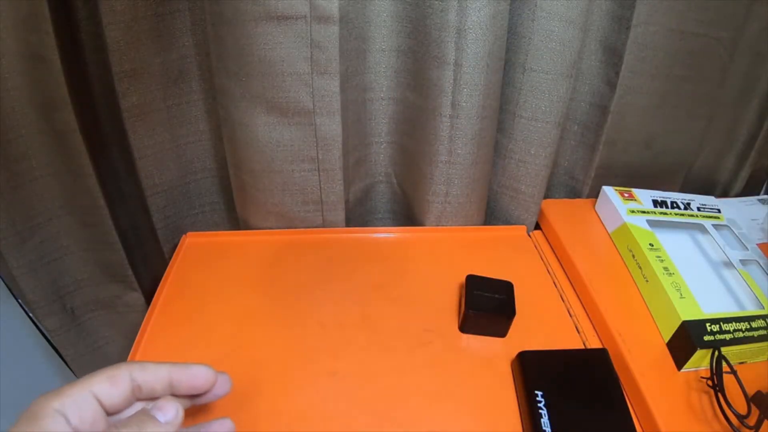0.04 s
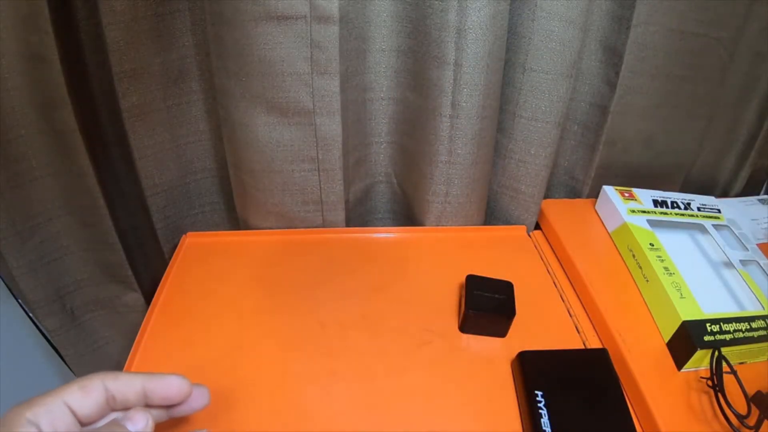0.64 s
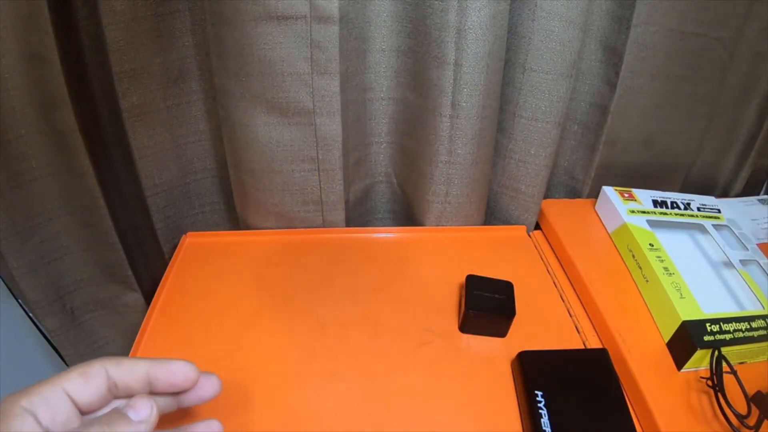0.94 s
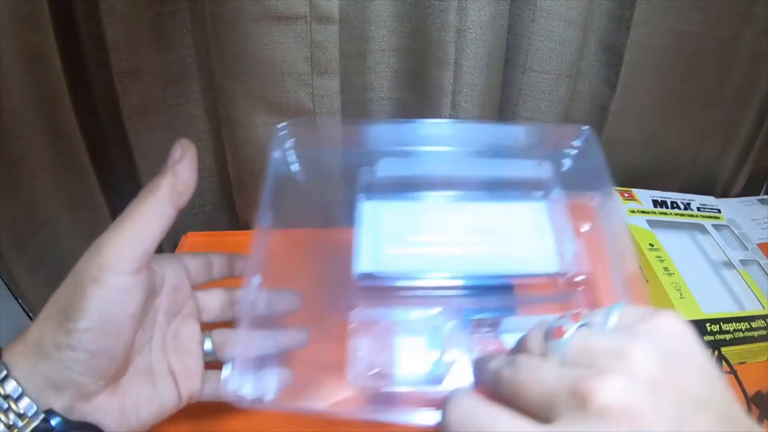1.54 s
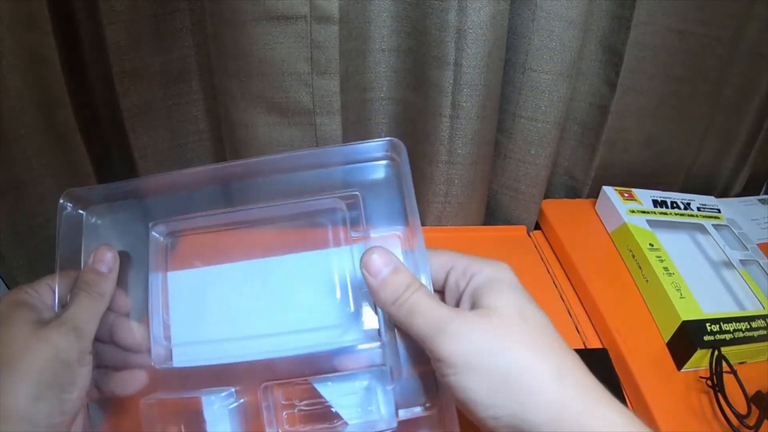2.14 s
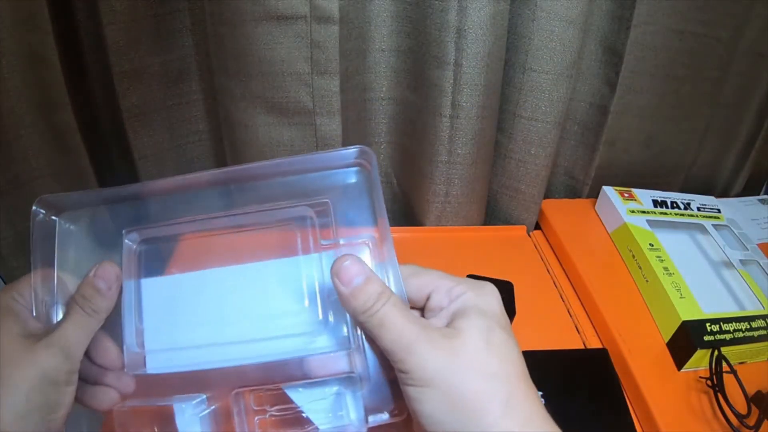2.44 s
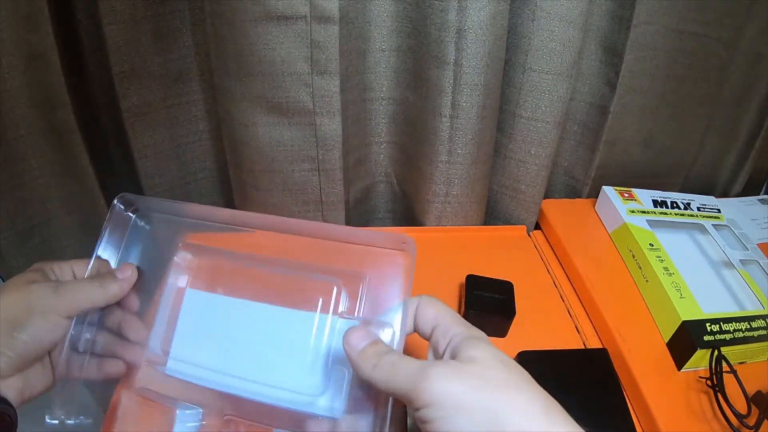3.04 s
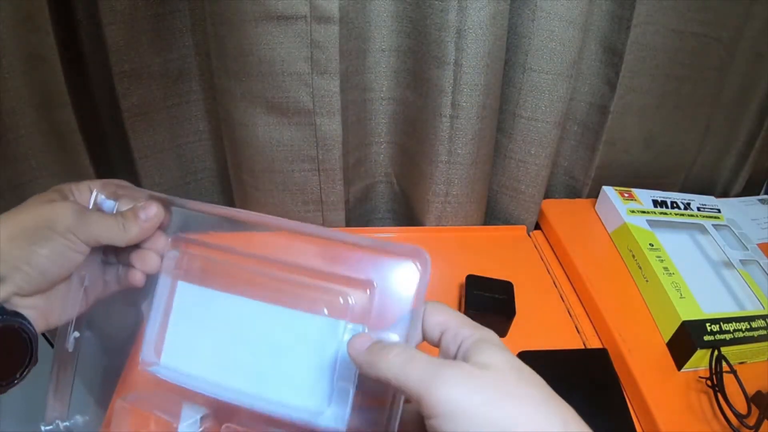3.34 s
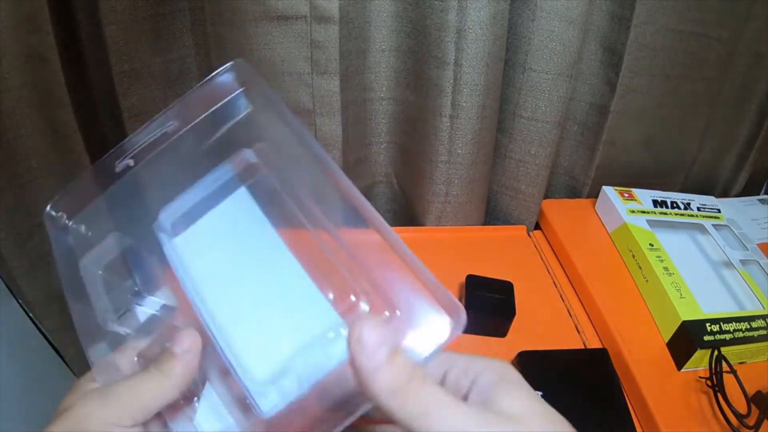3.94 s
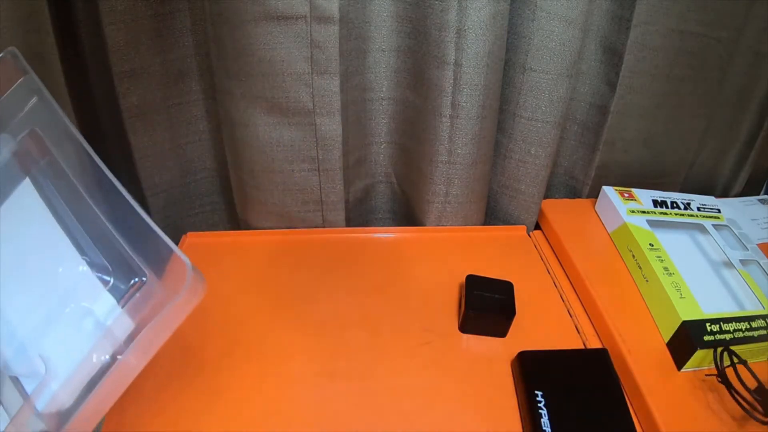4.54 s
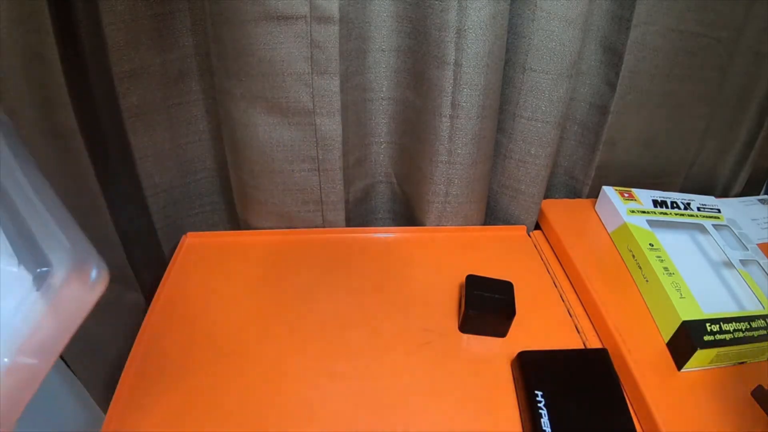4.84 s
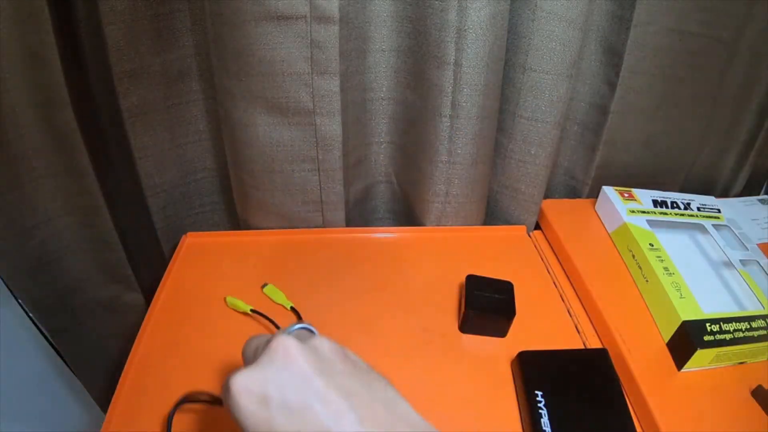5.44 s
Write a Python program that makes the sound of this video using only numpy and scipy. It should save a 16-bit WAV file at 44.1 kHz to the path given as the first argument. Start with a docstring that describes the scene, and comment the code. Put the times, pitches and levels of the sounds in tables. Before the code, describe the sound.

In a small curtained room with a faint hiss, cardboard scrapes and knocks hollowly as a plastic tray is tugged free. A flurry of finger taps and soft, deep bumps follows as the tray flexes, with creaky rubbing, light crinkles and one sharp snap. The handling thins out, then a charger lands with a bright clatter and a short cable scrape. Everything is heard close, in mono.

```python
"""A small curtained room with a faint hiss, one mono microphone close to the hands.
A thin clear plastic tray is worked out of a cardboard box, which scrapes and knocks hollowly.
Turned in the hands, the tray thuds and buckles with dry snaps; fingers tap, slide and crinkle on it.
At the end a hard charger clatters on the table and its cable drags after it. The loudest peaks clip."""
import sys
import numpy as np
from scipy import signal
from scipy.fft import rfft, irfft
from scipy.io import wavfile

SR = 44100
rng = np.random.default_rng(int(sys.argv[2]) if len(sys.argv) > 2 else 0)


def transcribe(signal):
    """Save signal, clipped to [-1, 1], as a 16-bit WAV file at the path in sys.argv[1]."""
    frames = np.atleast_2d(signal).T
    limited = np.clip(frames, -1, 1)
    pcm = np.round(limited * 32767).astype(np.int16)
    wavfile.write(sys.argv[1], SR, pcm)


N = 242550
TIME = np.arange(N) / SR
TOP_HZ = 16100


def amp(db):
    """Decibels to gain."""
    return 10 ** (np.asarray(db) / 20)


def rms(x):
    """Root mean square."""
    return np.sqrt(np.mean(x ** 2)) + 1e-12


def fade(t, t60):
    """Decay by 60 dB in t60 seconds."""
    return np.exp(-np.log(1000) * t / t60)


def swell(centre_s, half_s):
    """A bell-shaped rise and fall."""
    return np.exp(-np.minimum(((TIME - centre_s) / half_s) ** 2, 20))


def flicker(per_s):
    """A smooth random wander with a spread near 1."""
    return np.interp(TIME * per_s, np.arange(4096), rng.standard_normal(4096))


def add(track, start_s, sound):
    """Mix a sound into the track."""
    i = max(int(start_s * SR), 0)
    track[i:i + len(sound)] += sound[:N - i]


def dull(x, hz):
    """One-pole low-pass."""
    pole = np.exp(-2 * np.pi * hz / SR)
    return signal.lfilter([1 - pole], [1, -pole], x)


def rumble(hz):
    """Low noise two octaves wide, rms 1."""
    band = signal.butter(2, [hz / 2, 2 * hz], "band", fs=SR, output="sos")
    air = signal.sosfilt(band, rng.standard_normal(N))
    return air / rms(air)


# Noise floor at the microphone: frequency_hz, relative_density_db
NOISE_FLOOR = [(20, 13), (40, -9.5), (86, -10), (160, -14.5), (600, -18.5), (4500, -27.5), (13000, -32.5),
               (16000, -37)]

def background(hiss_db=-37.5, whine_hz=14734, whine_db=-62):
    """Microphone hiss, a low rumble and a thin electronic whine."""
    hz, db = np.transpose(NOISE_FLOOR)
    bins_hz = np.maximum(np.arange(N // 2 + 1) * SR / N, 1)
    spectrum = amp(np.interp(np.log(bins_hz), np.log(hz), db))
    hiss = irfft(rfft(rng.standard_normal(N)) * spectrum, N)
    whine = np.sqrt(2) * np.sin(2 * np.pi * whine_hz * TIME)
    return amp(hiss_db) * hiss / rms(hiss) + amp(whine_db) * whine


def room(x, wet_db=-11, t60=0.14, damp_hz=3580, build_s=0.0024):
    """Short diffuse reflections; the curtain takes their treble."""
    t = TIME[:SR // 2]
    tail = rng.standard_normal(len(t)) * fade(t, t60) * (1 - np.exp(-(t / build_s) ** 2))
    tail = dull(tail / np.sqrt(np.sum(tail ** 2)), damp_hz)
    return x + amp(wet_db) * signal.fftconvolve(x, tail)[:N]


# The tray swung close to the microphone: centre_s, half_length_s, level_db, centre_hz
AIR_SWELLS = [(1.367, 0.072, -20.5, 5.7), (4.493, 0.15, -40, 21)]

def draughts():
    """The broad face of the tray pushes slow swells of air."""
    return sum(amp(db) * rumble(hz) * swell(centre_s, half_s) for centre_s, half_s, db, hz in AIR_SWELLS)


# Low thuds of the tray, close up (its face giving way, and one higher, soft bump):
# start_s, level_db, pitch_hz
TRAY_THUDS = [(1.521, -22.5, 55), (1.565, -13.5, 55), (1.589, -13.5, 61.7), (1.695, -18.5, 71),
              (1.755, -11.5, 61.6), (1.783, -15, 67), (1.806, -40, 62.4), (1.827, -14, 76),
              (1.977, -11, 48.6), (2.013, -10, 47.7), (2.281, -20, 55.8), (2.695, -27, 53.3),
              (2.915, -19.5, 49.4), (3.094, -18.5, 73.7), (3.159, -9.5, 66.7), (3.776, -24, 65.6),
              (3.852, -19.5, 74.2), (4.358, -31.5, 162)]

def thuds(t60=0.046, rise_s=0.0075, gain_db=0.5, overtone_ratio=1.95, overtone_db=-10):
    """The tray swings briefly in and out, pushing air, before the hand stops it."""
    track, t = np.zeros(N), TIME[:SR // 5]
    envelope = (1 - np.exp(-t / rise_s)) * fade(t, t60)
    for start_s, level_db, pitch_hz in TRAY_THUDS:
        phase = 2 * np.pi * pitch_hz * t
        swing = -(np.sin(phase) + amp(overtone_db) * np.sin(overtone_ratio * phase)) * envelope
        add(track, start_s, amp(level_db + gain_db) * swing / np.abs(swing).max())
    return track


def touched(modes, stiffness, detune, spread_db):
    """Every touch bends the shell and meets another spot, so its modes shift in pitch and strength."""
    chance = rng.standard_normal((len(modes), 2))
    return [(hz * stiffness * np.exp(detune * shift), width * stiffness, db + spread_db * boost)
            for (hz, width, db), (shift, boost) in zip(modes, chance)]


def shell(force, modes, soft_hz, top_hz):
    """A thin shell passes the force on and rings at its strong modes; its material softens the treble."""
    out = force.copy()
    for hz, width, db in modes:
        out += amp(db) * signal.lfilter(*signal.iirpeak(min(hz, TOP_HZ), hz / width, fs=SR), force)
    return signal.lfilter(*signal.butter(2, top_hz, fs=SR), dull(out, soft_hz))


# A shell's four ranges (whole-body flex, hollow ring, wall clack, crease crack): low_hz, high_hz
SHELL_RANGES = [(90, 235), (310, 1000), (1000, 3500), (3500, 16000)]
BANDS = [signal.butter(3, edges, "band", fs=SR, output="sos") for edges in SHELL_RANGES]
OCTAVES = np.log2(np.sqrt(np.prod(SHELL_RANGES, axis=1)) / 1000)  # band centres, from 1 kHz

def balance(level_db, tilt, colour_db):
    """Level in each range: harder contact tilts the usual colour towards the treble."""
    return level_db + np.array(colour_db) + tilt * OCTAVES


def blows(table, colour_db, modes, soft_hz, top_hz, tick_db, treble_damping, detune,
          graze_db=-np.inf, grip=None):
    """A sharp tick, perhaps after a graze, scatters into dense modes that die fast, high ones first."""
    attack = int(0.012 * SR)
    track, t = np.zeros(N), TIME[:SR // 5] - TIME[attack]
    graze = amp(graze_db) * fade(abs(t), t60=0.028)
    for start_s, level_db, tilt, t60 in table:
        stiffness = 1 if grip is None else np.interp(start_s, *np.transpose(grip))
        struck = touched(modes, stiffness, detune, spread_db=2.5)
        levels_db = balance(level_db, tilt, colour_db)
        # The shell flexes more above a middling blow, and when the tray thuds at the same moment.
        with_thud = any(abs(start_s - thud[0]) < 0.013 for thud in TRAY_THUDS)
        levels_db[0] += 0.42 * (level_db + 15.5) + 7 * with_thud
        for octave, band, db in zip(OCTAVES, BANDS, levels_db):
            ring = fade(abs(t), t60 * 2 ** (-treble_damping * octave))
            force = rng.choice([-1., 1.], len(t)) * np.where(t < 0, graze, ring)
            force[attack] = amp(tick_db) * np.sqrt(np.sum(force ** 2))
            sound = signal.sosfilt(band, shell(force, struck, soft_hz, top_hz))
            onset_rms = max(rms(sound[attack:2 * attack]), rms(sound[2 * attack:3 * attack]))
            add(track, start_s + t[0], sound * amp(db) / onset_rms)
    return track


def slips(per_s, slip_s, smooth_db):
    """Stick-slip friction: tiny bursts of noise at random moments over a smooth hiss."""
    jerks = (rng.random(N) < per_s / SR).astype(float)
    grains = dull(jerks, 1 / (2 * np.pi * slip_s)) * rng.standard_normal(N)
    return grains / rms(grains) + amp(smooth_db) * rng.standard_normal(N)


# Colour of rubbing: flex_db, hollow_db, clack_db, crack_db
RUB_COLOUR = (-11, 1, -4.5, -12.5)

def slides(table, friction, modes, soft_hz, top_hz, detune, air_db, wander_db, gain_db=-2.5):
    """Each slide gathers speed, holds and runs out, rubbing the body and fanning air at the microphone."""
    track, t, air = np.zeros(N), TIME[:SR // 2], rumble(hz=60)
    rise = np.minimum(t / 0.009, 1)
    for start_s, length_s, level_db, tilt in table:
        span = (int(start_s * SR) + np.arange(len(t))) % N
        rubbed = touched(modes, stiffness=0.99, detune=detune, spread_db=-1.5)
        body = shell(friction[span], rubbed, soft_hz, top_hz)
        sound = amp(level_db + air_db) * air[span]
        for band, db in zip(BANDS, balance(level_db, tilt, RUB_COLOUR)):
            voice = signal.sosfilt(band, body)
            # The point of contact wanders, and the colour with it.
            sound += amp(db + wander_db * flicker(per_s=63)[span]) * voice / rms(voice)
        release = fade(np.maximum(t - length_s, 0), t60=0.25)
        add(track, start_s, sound * rise * release)
    return amp(gain_db) * track


def crinkles(table, per_s=72, centre_hz=4100, q=2.8, gain_db=-0.5, spread_db=2.5):
    """Tiny creases tick as the tray is tugged or stroked; a harder slide favours the high ones."""
    track, t = np.zeros(N), TIME[:SR // 20]
    for start_s, length_s, level_db, tilt in table:
        for size, octave in rng.standard_normal((round(per_s * length_s), 2)):
            hz = np.clip(centre_hz * 2 ** octave, 800, 12000)
            burst = rng.standard_normal(len(t)) * fade(t, t60=0.014)
            tick = signal.lfilter(*signal.iirpeak(hz, q, fs=SR), burst)
            db = level_db + gain_db + spread_db * min(size, 1) + tilt * np.log2(hz / 1000)
            add(track, start_s + length_s * rng.random(), amp(db) * tick / np.abs(tick).max())
    return track


# The charger's hard case: pitch_hz, width_hz, gain_db
CHARGER_RESONANCES = [(155, 120, 5.5), (1762, 24, 9.8), (3480, 57, 2.5), (4000, 33, 4), (4190, 56, 6.2),
                      (4950, 95, 4.9), (6100, 45, 3.6), (8410, 18, 9.3)]
# It lands on the table: start_s, level_db, tilt_db_per_octave, t60_s
CHARGER_LANDINGS = [(5.345, -17.5, 2.15, .1), (5.368, -21, -1.8, 0.15), (5.427, -26, -1, 0.17)]
# Colour of a landing: flex_db, hollow_db, clack_db, crack_db
LANDING_COLOUR = (-9, -1.5, 1.5, 1)
# Charger and cable dragging on the table: start_s, length_s, level_db, tilt_db_per_octave
TABLE_DRAGS = [(5.37, 0.043, -32.5, 4), (5.455, .06, -24, 1)]

def charger(scrape):
    """The hard case clatters brightly on the table and the cable scrapes after it."""
    clatter = blows(CHARGER_LANDINGS, LANDING_COLOUR, CHARGER_RESONANCES, soft_hz=4900, top_hz=14500,
                    tick_db=-21, treble_damping=0.17, detune=0.00085)
    drag = slides(TABLE_DRAGS, scrape, CHARGER_RESONANCES, soft_hz=2070, top_hz=12600,
                  detune=0.02, air_db=-10, wander_db=1)
    return clatter + drag


# The hollow cardboard box: pitch_hz, width_hz, gain_db
BOX_RESONANCES = [(123, 12, -11), (423, 7.7, -5), (481, 21.5, 20.5), (551, 76, 15), (646, 23, 9),
                  (685, 24, 17), (717, 49, 15.5), (1370, 530, 14.5), (1920, 110, 10.5)]
# The tray catching inside it: start_s, level_db, tilt_db_per_octave, t60_s
BOX_CATCHES = [(0.035, -31.5, -1, .24), (0.333, -33.5, -0.5, .04), (0.361, -31.5, 1, 0.13),
               (0.413, -26.5, -1, .09), (0.432, -23.5, -0.5, 0.32), (0.479, -29.5, 1, 0.2),
               (0.558, -17.5, 1.45, 0.078), (0.573, -22.5, -1.5, 0.086), (0.666, -29, -1.5, 0.1),
               (0.715, -17.5, -0.25, 0.084), (0.803, -40.5, 2, 0.078), (0.919, -35, 1, 0.13),
               (1.097, -42, 3.5, 0.41), (1.197, -36.5, 1.1, .12)]
# Colour of a knock: flex_db, hollow_db, clack_db, crack_db
KNOCK_COLOUR = (-8.5, 2.5, -1.5, -10.5)
# Pulls that draw the tray out: start_s, length_s, level_db, tilt_db_per_octave
BOX_PULLS = [(.01, 0.17, -43.5, 0.7), (0.262, 0.28, -39, 1), (0.378, .15, -38, -2.5),
             (0.598, 0.17, -30.5, -2.5), (0.835, 0.043, -34, -1), (0.898, 0.071, -31, 1.55),
             (0.997, 0.045, -42, -1.8), (1.098, 0.058, -40, 0)]

def box(scrape):
    """The tray scrapes and crinkles along the cardboard, which knocks hollowly where it catches."""
    knocks = blows(BOX_CATCHES, KNOCK_COLOUR, BOX_RESONANCES, soft_hz=1490, top_hz=9900,
                   tick_db=-8, treble_damping=0.22, detune=0.013, graze_db=-14.5)
    pulls = slides(BOX_PULLS, scrape, BOX_RESONANCES, soft_hz=1830, top_hz=9900,
                   detune=0.049, air_db=-15.5, wander_db=4.5)
    return knocks + pulls + crinkles(BOX_PULLS)


# Skin chirping on plastic: centre_s, half_length_s, pitch_hz, glide_octaves_per_s, level_db
SKIN_SQUEAKS = [(0.296, 0.009, 2600, -1, -43), (0.319, 0.0053, 3900, -1, -36.5),
                (0.926, 0.0024, 8250, 2, -25), (0.984, 0.009, 4400, 20.5, -36),
                (2.048, 0.013, 3210, 4, -34.5)]

def squeaks(roughness=0.092, waver_hz=870):
    """For a moment the slips fall into step and give an unsteady pitch."""
    track = np.zeros(N)
    waver = dull(rng.standard_normal(N), waver_hz)
    waver = roughness * waver / rms(waver)
    for centre_s, half_s, pitch_hz, glide, level_db in SKIN_SQUEAKS:
        hz = pitch_hz * 2 ** np.clip(glide * (TIME - centre_s), -1, 1) * (1 + waver)
        tone = np.sqrt(2) * np.sin(2 * np.pi * np.cumsum(hz) / SR)
        add(track, 0, amp(level_db) * swell(centre_s, half_s) * tone)
    return track


# The thin plastic tray, close to the microphone: pitch_hz, width_hz, gain_db
TRAY_RESONANCES = [(145.4, 37, 2.1), (282.7, 55, 17.3), (409, 13, 5), (396, 153, 10.4), (709, 330, 3.1),
                   (838, 33, 4.2), (1192, 39, 9.6), (1407, 98, 10.5), (1984, 37, 0.53), (2990, 290, 0.81),
                   (4090, 250, 0.53)]
# Fingers landing and shifting their hold: start_s, level_db, tilt_db_per_octave, t60_s
FINGER_TAPS = [(1.496, -19.5, -2.5, .07), (1.522, -25.5, 1.2, 0.033), (1.568, -25, -4, 0.14),
               (1.583, -25, -1.5, 0.036), (1.648, -21, -1.5, 0.066), (1.675, -20.5, -0.5, 0.12),
               (1.694, -16.5, 0.4, 0.046), (1.739, -16, -2, 0.053), (1.75, -11.5, -1.2, 0.052),
               (1.785, -21.5, 0.9, 0.061), (1.803, -15.5, -2.1, 0.062), (1.846, -27.5, -3.5, 0.11),
               (1.934, -39.5, -11.5, 0.12), (1.973, -20, -1.1, 0.056), (1.987, -16.5, -3, 0.048),
               (2.15, -31.5, 1.6, 0.015), (2.19, -36.5, 2.1, 0.063), (2.282, -25.5, -1.5, 0.083),
               (2.346, -22.5, -3, 0.087), (2.376, -28, -1.7, 0.041), (2.46, -25, -2, 0.54),
               (2.532, -24, 2, 0.023), (2.595, -23.5, 1.1, 0.029), (2.621, -23.5, 0.9, 0.094),
               (2.698, -28.5, 0.5, 0.082), (2.818, -31, -1, 0.022), (2.929, -27.5, 1.5, 0.076),
               (3.036, -35.5, 1, 0.044), (3.058, -26.5, 1, 0.049), (3.091, -17, 0.05, 0.06),
               (3.158, -19, -0.5, 0.1), (3.402, -31, 0, 0.11), (3.447, -33, -1.4, 0.11),
               (3.553, -57, 8, .025), (3.567, -47.5, -12, 0.037), (3.739, -38.5, -2, 0.074),
               (3.781, -23, -3.5, 0.053), (3.857, -16.5, -1.4, 0.048), (4.55, -46, 4, 0.06),
               (4.577, -39.5, 3.5, 0.16), (4.957, -37.5, 0.7, 0.072)]
# Held by its rim alone, the tray rings higher when tapped: time_s, pitch_ratio
RIM_GRIP = [(3.6, 1.033), (3.75, 2.81)]
# Creases flipping over: start_s, level_db, tilt_db_per_octave, t60_s
CREASE_SNAPS = [(2.012, -26, 1.5, 0.043), (2.261, -28.5, 1.3, 0.026), (2.326, -25, -1.2, 0.015),
                (3.2555, -12.5, 0.95, 0.035), (4.002, -28.5, -2.5, 0.031)]
# Colours of a tap and a snap: flex_db, hollow_db, clack_db, crack_db
TAP_COLOUR = (-19.5, 0.36, -2, -10.5)
SNAP_COLOUR = (-11, -3, 3.5, -5.5)
# Fingers sliding on the sheet: start_s, length_s, level_db, tilt_db_per_octave
FINGER_STROKES = [(1.332, 0.015, -34.5, -1.5), (1.405, .07, -36.5, -2.3), (1.48, .015, -32, .3),
                  (1.541, 0.16, -30.5, -1.5), (1.755, 0.064, -37, 1), (2.021, 0.037, -23.5, -1.5),
                  (2.181, 0.086, -32.5, -1), (2.353, 0.077, -34.5, -2), (2.438, 0.045, -30.5, -2),
                  (2.529, 0.093, -30.5, 3), (2.727, 0.1, -33.5, 1), (2.913, .075, -34, 3.5),
                  (3.103, 0.12, -38, 2), (3.267, 0.055, -34, 0.5), (3.424, 0.049, -33, 2),
                  (3.536, 0.15, -49, -4), (3.795, .05, -29.5, -1), (3.865, 0.013, -37, 3.5),
                  (4.345, 0.095, -44, 1.3), (4.453, 0.034, -50.5, 5.5), (4.583, 0.018, -41.5, 4.5)]

def tray(catch_db=5.5):
    """The sheet rings under the fingers, buckles with dry snaps and creaks as it is stroked."""
    taps = blows(FINGER_TAPS, TAP_COLOUR, TRAY_RESONANCES, soft_hz=1460, top_hz=10100,
                 tick_db=-5, treble_damping=0.42, detune=0.108, graze_db=-12.5, grip=RIM_GRIP)
    snaps = blows(CREASE_SNAPS, SNAP_COLOUR, TRAY_RESONANCES, soft_hz=2159, top_hz=10648,
                  tick_db=-5.5, treble_damping=0.45, detune=0.03)
    # Skin on plastic catches and lets go many times a second.
    creak = slips(per_s=450, slip_s=0.0021, smooth_db=-0.5) * amp(catch_db * flicker(per_s=59))
    strokes = slides(FINGER_STROKES, creak, TRAY_RESONANCES, soft_hz=3950, top_hz=11100,
                     detune=0.11, air_db=-15, wander_db=1.7)
    return taps + snaps + strokes + crinkles(FINGER_STROKES)


def scene():
    """All the handling in one room, heard by one close microphone."""
    air = background() + draughts() + thuds()
    scrape = slips(per_s=800, slip_s=0.0026, smooth_db=-11.5)  # cardboard and table scrape evenly
    handling = charger(scrape) + box(scrape) + squeaks() + tray()
    mono = air + room(handling)
    return np.array([mono, mono])


def record(dry):
    """The recorder clips at full scale and cuts the highest treble."""
    low_pass = signal.ellip(8, 0.2, 70, TOP_HZ, fs=SR, output="sos")
    return signal.sosfilt(low_pass, np.clip(dry, -1, 1))


dry = scene()
out = record(dry)
transcribe(out)
```